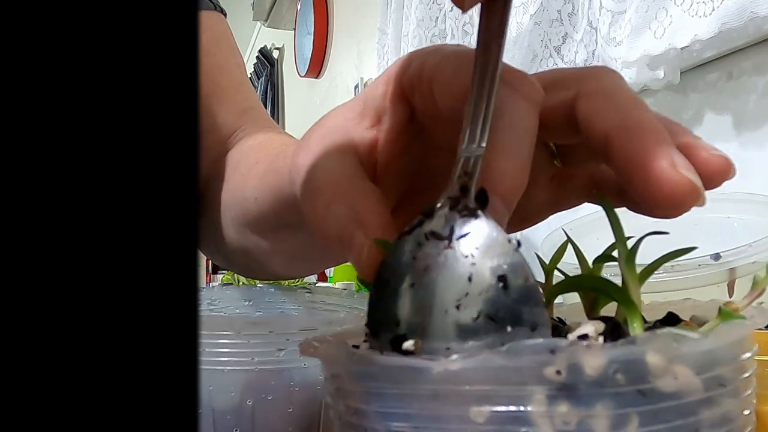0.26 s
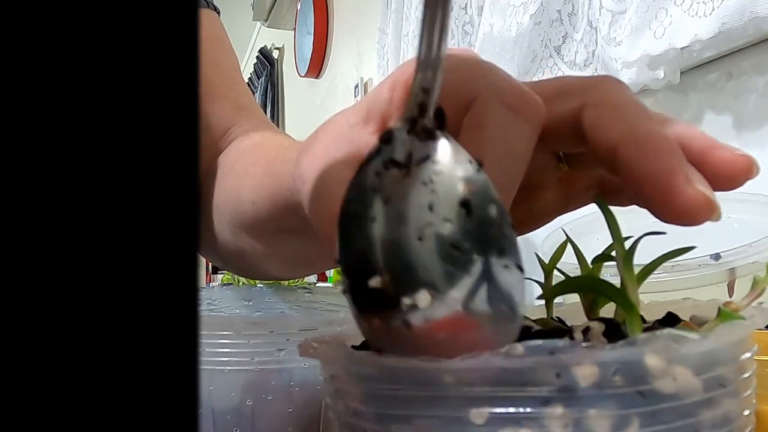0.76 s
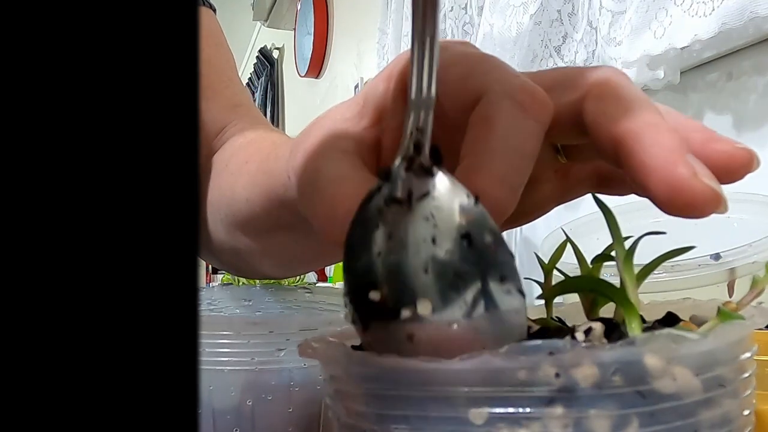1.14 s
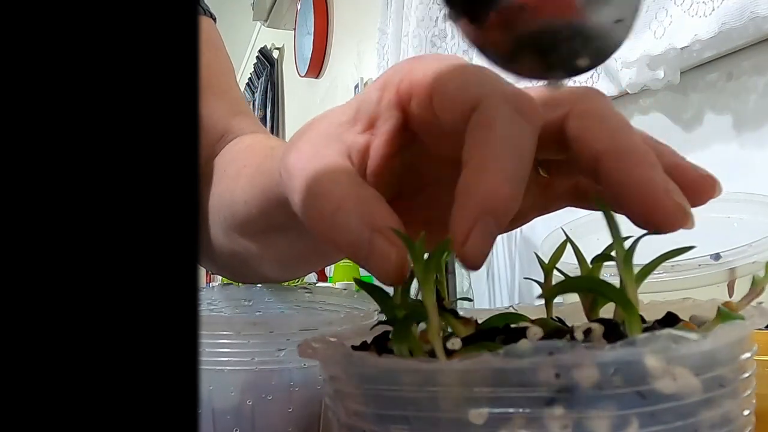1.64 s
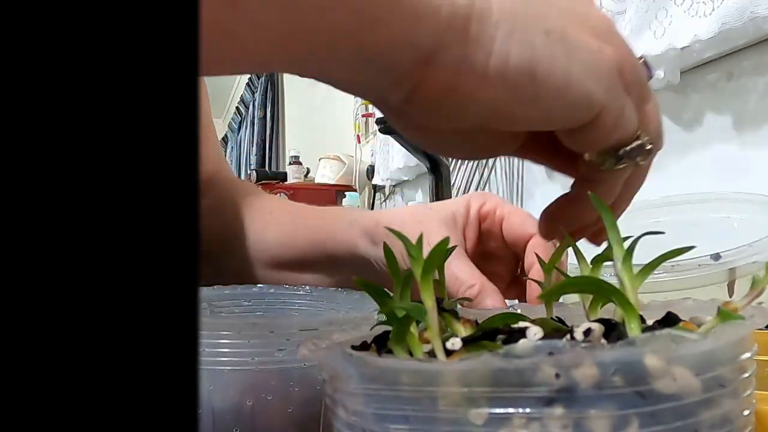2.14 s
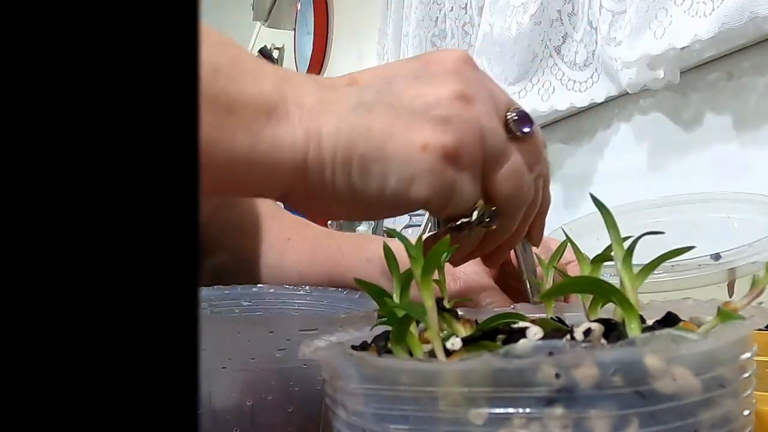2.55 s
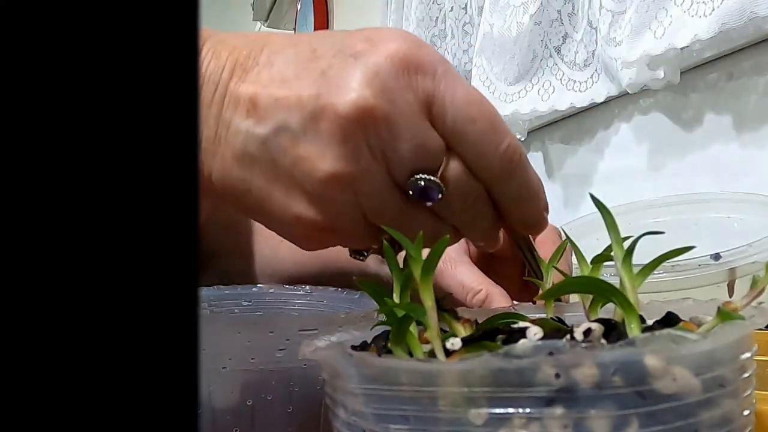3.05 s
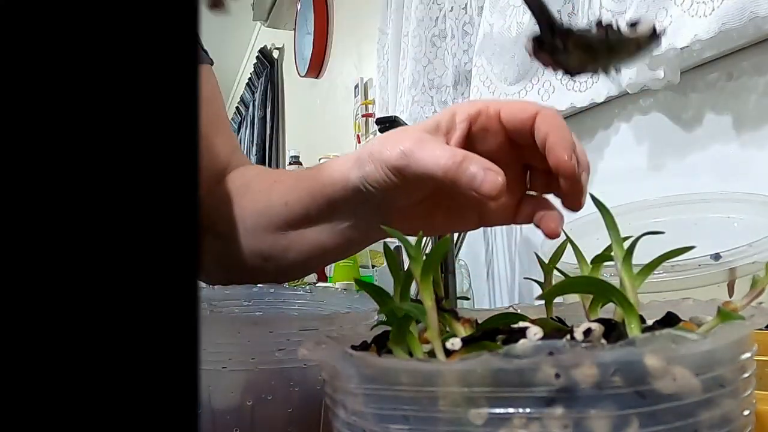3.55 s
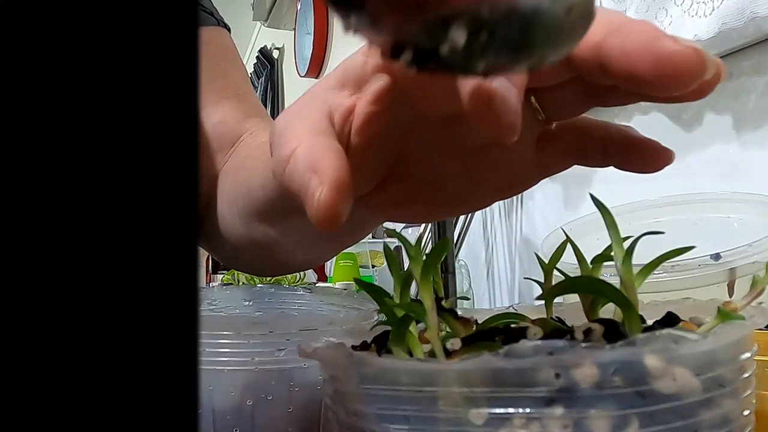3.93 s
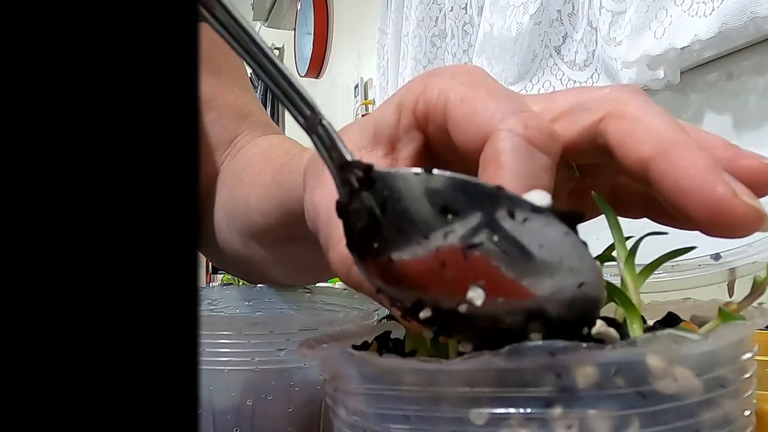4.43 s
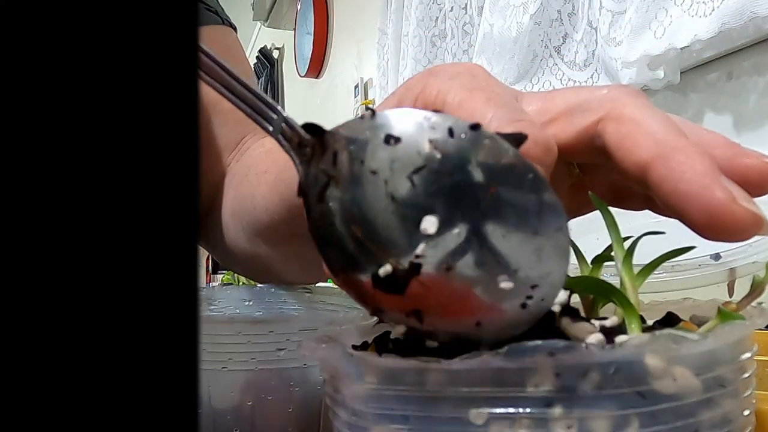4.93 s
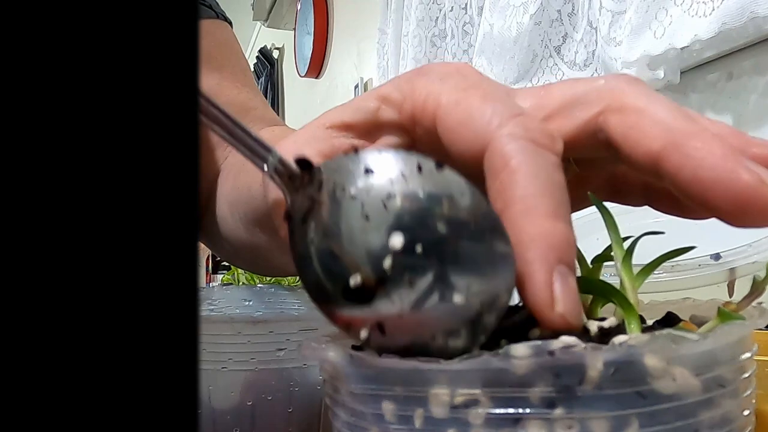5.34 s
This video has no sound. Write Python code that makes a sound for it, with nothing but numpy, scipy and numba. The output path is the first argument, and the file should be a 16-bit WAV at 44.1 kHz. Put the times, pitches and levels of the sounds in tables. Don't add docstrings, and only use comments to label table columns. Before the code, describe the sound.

A quiet small kitchen with a low refrigerator hum, soft air rumble and faint hiss, picked up in stereo very close to a thin plastic pot. From 0 to 0.65 s a steel spoon presses bark chips and perlite: dry, bright crunches, brittle snaps and ticks, the wall flexing. Shorter pushes come at about 0.8 and 1.1 s, with faint grit scraping the steel, fading to near quiet by 1.7 s. From 2.2 to 3.0 s the spoon digs in a deeper tub a little to the right and further off: duller, hollow rustling strokes, knocks, brief wall rings and low table thuds, strongest around 2.4 and 2.6-2.8 s. Light rim clips follow at 3.15-3.27 s. After a lull, crumbs tick on the pot at 4.05 and 4.2 s. From 4.75 s strong, close crunching and snapping return, densest around 5.0-5.2 s, with tiny steel pings, thinning out to the end at about 5.6 s.

```python
import sys
import numpy as np
from scipy import signal
from scipy.fft import rfft, irfft
from scipy.io import wavfile
from numba import njit

SR = 44100
rng = np.random.default_rng(int(sys.argv[2]) if len(sys.argv) > 2 else 0)


def materialize(psi):
    bounded = np.clip(np.atleast_2d(psi).T, -1, 1)
    quanta = np.round(bounded * 32767).astype(np.int16)
    wavfile.write(sys.argv[1], SR, quanta)


def field_ratio(decibels):
    return 10 ** (np.asarray(decibels, dtype=float) / 20)


N = 246078
TIME = np.arange(N) / SR

# (time [s], pitch [Hz], level [dB])
FRIDGE_HUM = [(0.0, 48.7, -48.5), (1.15, 49.03, -52), (1.3, 47.84, -46), (1.71, 49.6, -52),
              (1.86, 50.12, -45.5), (3.57, 49.03, -48), (4.74, 49.44, -44.5), (4.79, 49.1, -50),
              (4.961, 48.95, -47), (5.0, 47.04, -60), (5.19, 46.7, -40), (5.28, 50.1, -53.5),
              (5.41, 50, -51), (5.58, 46.9, -45.5)]
# (frequency [Hz], density [dB per Hz])
AIR_RUMBLE = [(15, -40), (30, 0.5), (62, -2.5), (80, -7), (110, -6.5), (135, -15), (162, -6), (195, -17),
              (300, -16), (420, -26), (600, -35), (1400, -60)]
# (frequency [Hz], density [dB per Hz])
AIR_HISS = [(300, -12), (600, 0), (2500, -5), (4000, -8), (6500, -10), (8500, -15), (10500, -26),
            (15000, -43)]

# (time [s], length [s], crunch [dB], dull part [dB], bright part [dB])
FIRST_PUSHES = [(0, 0.025, -40, -12, -5), (.03, 0.094, -46.5, -9.5, -7.5), (.14, 0.13, -59, -1, -7.5),
                (.235, 0.061, -69.5, 1, -1), (.31, 0.042, -61, -1, -3.5), (.37, 0.048, -64, -13, -11),
                (.42, 0.053, -62.5, -37, -7), (.525, 0.084, -54, -8.5, -10.5), (.592, 0.022, -60, 2, -11),
                (.69, 0.044, -66, -13, -3), (.828, 0.011, -50, -8, -12), (1.08, 0.01, -51.5, -4, -4),
                (1.105, 0.038, -49.5, -1.5, -8), (1.155, 0.1, -62, -12, -10.5),
                (1.31, 0.086, -72.5, -24, -7), (1.365, 0.021, -53.5, -6.5, -10.5),
                (1.42, 0.017, -58.5, -11, -8.5), (1.672, 0.026, -72.5, -11, -7)]
# (time [s], length [s], crunch [dB], dull part [dB], bright part [dB])
SECOND_PUSHES = [(4.28, 0.038, -75, -10, -35), (4.393, 0.044, -56.5, -12, -12), (4.6, 0.013, -73, -20, -11),
                 (4.773, 0.0034, -57, -28, 0), (4.813, 0.013, -44, -5.5, -31),
                 (4.869, 0.0042, -59.5, 7, 2.5), (4.976, 0.021, -57.5, -4, -26),
                 (5.038, 0.0028, -38.5, -1.5, -16), (5.076, 0.0074, -40.5, -12.5, -12),
                 (5.083, 0.019, -54, -6, -17), (5.129, 0.052, -44, -7, -3.5), (5.368, 0.024, -46, 0, -12),
                 (5.444, 0.1, -52.5, -10, -12), (5.525, 0.058, -57, -6, -4)]
# (time [s], length [s], crunch [dB], dull part [dB], bright part [dB])
SETTLING = [
    (0.078, 0.85, -69.5, -5, -9),
    (1.11, 0.43, -87, 9, 3),
    (4.221, 0.78, -79, -6, -5),
    (4.757, 0.85, -72, 2.5, -3),
]
# (time [s], peak [dB], pitch [Hz], bright part [dB])
FIRST_SNAPS = [(0.0054, -18, 3300, -20), (0.0134, -26, 3420, -30), (0.0484, -27.5, 2230, -18),
               (0.0635, -29, 2320, -15), (0.0784, -25.5, 2530, -19), (0.0962, -23, 2700, -28),
               (0.1054, -27.5, 2320, -28), (0.1346, -28, 2423, -27), (0.1514, -40, 3655, -25),
               (0.2035, -33.5, 2520, -35), (0.2435, -27.5, 3750, -37), (0.2504, -35, 2680, -21),
               (0.2824, -40, 2030, -23), (0.3174, -33, 2400, -23), (0.379, -37, 2468, -19),
               (0.4543, -35, 2320, -24), (0.5507, -31.5, 2553, -28), (0.5685, -27.5, 2500, -23.5),
               (0.5985, -20.5, 3800, -31), (0.616, -32, 3743, -30), (0.8315, -22, 2160, -45),
               (0.8396, -27, 2700, -27), (0.86, -35.5, 2370, -25), (0.8909, -35.5, 2560, -33),
               (1.085, -25.5, 2600, -27), (1.1124, -24.5, 2220, -32), (1.1354, -28, 2920, -29),
               (1.1786, -40, 2600, -14), (1.3668, -31, 2442, -32), (1.4353, -35.5, 2480, -24)]
# (time [s], peak [dB], pitch [Hz], bright part [dB])
SECOND_SNAPS = [(4.775, -20.5, 2710, -24), (4.8083, -24, 3020, -17), (4.815, -16, 3200, -23),
                (4.8709, -19, 1520, -35), (4.9098, -28, 1680, -28), (4.9604, -23.5, 2770, -19),
                (4.9829, -22, 2190, -31), (4.9922, -29, 2270, -40), (5.0304, -24, 2200, -40),
                (5.0382, -25, 1730, -36), (5.0564, -25, 2400, -15.5), (5.0781, -22, 2420, -34),
                (5.0847, -14.5, 2760, -32), (5.0979, -18, 2690, -31), (5.1076, -31, 2390, -24),
                (5.1233, -46, 2400, -34), (5.1404, -28, 2300, -36), (5.1513, -26, 3750, -32),
                (5.1634, -40, 2662, -22), (5.1857, -20, 1870, -28), (5.243, -38, 4150, -3.5),
                (5.2647, -28, 2600, -30), (5.2887, -34.5, 2267, -30), (5.3306, -38, 2400, -24),
                (5.3547, -32.5, 3000, -16), (5.3737, -22.5, 3000, -20.5), (5.4073, -30, 1930, -20),
                (5.4235, -27, 2520, -20.5), (5.4919, -22, 3810, -19), (5.5031, -24.5, 4100, -32)]
# (time [s], peak [dB], pitch [Hz], bright part [dB])
SMALL_TICKS = [(0.0255, -38, 1710, -7), (0.047, -26, 2310, -4), (0.109, -27.5, 1800, -19),
               (0.1633, -32, 3730, -15), (0.1724, -38, 2890, -1), (0.258, -38, 3680, -7),
               (0.271, -39, 2630, -5), (0.434, -42, 2600, -9), (0.519, -44, 2649, -12),
               (0.535, -49, 2390, -22), (0.601, -15.5, 3330, -26), (0.621, -42, 5060, -5),
               (0.6366, -41, 5300, -9), (0.813, -39, 1980, -12), (0.872, -50, 2482, -17),
               (0.881, -47, 3570, -17), (1.119, -26, 2518, -18), (1.1431, -31, 2430, -13),
               (4.7526, -48, 3530, 0), (4.773, -36, 2760, -9), (4.788, -31, 4700, -11),
               (4.7952, -32, 2950, -13), (4.8027, -30, 2580, -21), (4.873, -22.5, 2620, -29),
               (4.8885, -38, 2650, -31), (4.8944, -33, 1510, -6), (4.9188, -31, 2910, -15),
               (4.93, -32, 2330, -26), (4.9676, -34, 2480, -4), (5.002, -39, 2280, -30),
               (5.0209, -40, 2260, -32), (5.0394, -17, 2140, -26), (5.0481, -32, 2450, -9),
               (5.0813, -18, 2280, -29), (5.135, -19, 2550, -9), (5.1382, -17.5, 3840, -6),
               (5.2324, -39, 2336, -4), (5.3863, -27, 2470, -13), (5.444, -35, 3920, -13)]
# (time [s], peak [dB], pitch [Hz], bright part [dB])
LOOSE_CRUMBS = [(1.5253, -57, 3400, -16), (4.0544, -39.5, 3030, -15.5), (4.078, -51, 2616, -18),
                (4.2199, -26.5, 1620, -18.5), (4.314, -50, 1540, -21), (4.3496, -56, 2440, -10),
                (4.4102, -44, 2953, -11), (4.432, -41, 2580, -26), (4.607, -52, 3240, -14),
                (4.643, -56.5, 2490, -19), (5.3128, -39, 2820, -11), (5.475, -31.5, 2120, -14),
                (5.5341, -27, 4540, -28), (5.563, -36, 2470, -6), (1.093, -31, 2480, -24),
                (1.501, -64, 7500, -6), (0.972, -60, 2500, -15), (4.185, -66, 4000, -13.5),
                (4.287, -59, 2400, -25), (1.3206, -45.5, 2550, -29), (4.542, -64, 5004, 0.5),
                (4.616, -60, 4500, -5), (5.299, -42, 2300, -20), (5.5372, -25, 4550, -27),
                (5.576, -41, 5500, -2)]
# (time [s], peak [dB], pitch [Hz])
WALL_FLEXES = [(0.014, -27, 916), (0.048, -35, 940), (0.085, -35, 920), (0.105, -38, 931),
               (0.161, -40, 760), (0.248, -48, 966), (0.284, -35, 940), (0.317, -28.5, 860),
               (0.601, -25.5, 1160), (0.831, -39, 1070), (1.105, -41, 711), (1.113, -29, 1300),
               (1.128, -34, 917), (1.135, -40, 1140), (1.144, -35, 1060), (4.809, -30, 1180),
               (4.819, -16.5, 1150), (4.827, -24, 1040), (4.91, -40, 1330), (4.984, -24.5, 1120),
               (4.991, -27, 1210), (5.038, -18.5, 905), (5.057, -30, 1190), (5.085, -23.5, 990),
               (5.096, -26, 900), (5.137, -21, 1060), (5.15, -31, 1366), (5.162, -45, 920),
               (5.185, -24, 1336), (5.265, -33, 1080), (5.375, -43, 1018), (5.423, -30, 1056),
               (5.538, -41, 980), (5.551, -38, 945), (5.567, -28.5, 1100)]
# (time [s], peak [dB], pitch [Hz], t60 [s])
WALL_DROPS = [(4.054, -44, 1200, .01), (4.226, -50, 1560, .13), (4.2225, -42, 1650, .03),
              (4.223, -54, 1010, .03), (4.223, -47, 1314, .05), (4.054, -47, 2000, .008),
              (4.054, -46, 4900, .005), (4.2205, -37, 4900, .012), (4.2205, -37, 5800, .008),
              (4.209, -58, 1600, .03), (4.2205, -36, 3450, .012), (4.2205, -36, 2600, .015)]
# (frequency [Hz], density [dB per Hz])
POT_CRUNCH_COLOUR = [(210, -47), (350, -37), (563, -15.5), (892, -15), (1410, -23), (2420, -4), (3780, -13),
                     (7010, -21), (7960, -13), (13000, -43), (15500, -18)]
# (frequency [Hz], width [Hz], level [dB])
POT_MODES = [(1070, 230, 3), (1730, 107, 6), (2530, 780, 3.5), (3750, 320, 8), (5220, 2250, 8)]

# (frequency [Hz], width [Hz], level [dB])
SPOON_MODES = [(2430, 90, -7), (3460, 160, -10), (3850, 140, -11), (6550, 220, -16), (4900, 260, -16),
               (5970, 100, -17), (7870, 80, -8), (9290, 90, -15), (13000, 150, -24)]
# (time [s], length [s], level [dB])
GRIT_SLIDES = [
    (0.672, 0.081, -81.5),
    (1.203, 0.054, -78.5),
    (1.326, 0.063, -82),
    (1.517, 0.0048, -73),
    (4.38, 0.11, -91),
    (4.563, 0.031, -89),
    (5.202, 0.013, -68),
    (5.236, 0.025, -69),
    (5.366, 0.029, -68),
]
# (time [s], peak [dB])
BOWL_PINGS = [(0.7345, -55), (1.2136, -63), (1.2261, -58), (1.524, -66), (5.053, -55), (5.1305, -50),
              (5.152, -48), (5.2086, -55), (5.244, -47), (5.366, -56), (5.3865, -50)]
# (frequency [Hz], level [dB], t60 [s])
BOWL_MODES = [(5980, -8, .025), (7876, 0, .032), (9300, -4, .05), (11580, -20, .04), (13010, -9, .06)]

# (time [s], length [s], crunch [dB], bright part [dB])
DIG_STROKES = [(2.233, 0.034, -49.5, -7), (2.323, 0.073, -45, -24), (2.384, 0.057, -34.5, -16.5),
               (2.439, 0.019, -42.5, -11), (2.469, 0.088, -47, -5), (2.55, 0.059, -40.5, -7.5),
               (2.598, 0.033, -39.5, -6), (2.632, 0.04, -42, -10), (2.703, 0.086, -40, -5),
               (2.776, 0.036, -40, -5.5), (2.814, 0.12, -44, -9), (2.934, 0.11, -47.5, -13.5),
               (3.05, 0.05, -54.5, -21), (3.152, 0.022, -54, -7), (3.178, 0.058, -57, -6.5),
               (3.249, 0.039, -51.5, -7.5), (2.259, 0.87, -60, -4.5), (3.289, 0.063, -63, -6),
               (3.34, 0.16, -75, 2)]
# (time [s], peak [dB], pitch [Hz])
TUB_KNOCKS = [(2.3336, -30, 1070), (2.3709, -27.5, 690), (2.3945, -20.5, 800), (2.4031, -20, 1370),
              (2.4115, -32, 1130), (2.4494, -28, 1000), (2.5538, -23.5, 860), (2.561, -24, 829.3),
              (2.6088, -24, 1360), (2.6156, -21, 786), (2.6411, -18, 1430), (2.7297, -22, 900),
              (2.7506, -16, 910), (2.7863, -13.5, 900), (2.7919, -13.5, 760), (2.7986, -40, 630),
              (3.2052, -35, 846), (2.247, -35, 750), (2.256, -33.5, 1010), (2.36, -39, 1130),
              (2.648, -19, 1320), (3.001, -36, 1476), (3.088, -46, 964), (3.222, -42, 1500)]
# (time [s], peak [dB], pitch [Hz], t60 [s])
WALL_RINGS = [
    (2.369, -37, 620, .07),
    (2.404, -25, 1118, 0.065),
    (2.42, -36, 446, 0.081),
    (2.61, -29, 774, 0.069),
    (2.783, -25.5, 1515, 0.044),
    (2.787, -29.5, 614, 0.098),
    (2.797, -31, 608, 0.067),
]
# (time [s], peak [dB], pitch [Hz])
TABLE_BUMPS = [(2.406, -32, 91.5), (2.414, -18.5, 124), (2.453, -28, 105), (2.557, -22.5, 167),
               (2.582, -39, 148), (2.606, -21, 118), (2.645, -23, 167), (2.729, -31.5, 153),
               (2.75, -42.5, 183), (2.784, -18.5, 202), (2.799, -32.5, 172)]
# (time [s], peak [dB], pitch [Hz], middle part [dB], bright part [dB])
RIM_CLIPS = [
    (3.1575, -28.5, 1530, -3.5, -18),
    (3.195, -42.5, 1800, 9, 0),
    (3.2557, -31.5, 1432, 7.5, -1.5),
    (3.2695, -33, 1120, -2, -25),
]
# (frequency [Hz], density [dB per Hz])
TUB_CRUNCH_COLOUR = [(180, -41), (300, -40.5), (484, 0), (600, -2.5), (674, -2.5), (794, 1.5), (1540, -4),
                     (1970, -16.5), (6360, -24), (12300, -41.5), (15500, -81)]
# (frequency [Hz], width [Hz], level [dB])
TUB_MODES = [(604, 18, 4.5), (860, 167, -1), (1110, 27, -19), (1350, 110, -4), (1510, 45, -1),
             (2215, 57, -4.5), (3320, 50, -7), (4120, 55, -8.5)]
# (frequency [Hz], width [Hz], level [dB])
THUD_MODES = [(123, 96, 2), (169, 57, 1.5), (279, 52, -0.5)]

LONGER_RING = 0.55


def level(x, db):
    return x * field_ratio(db) / np.sqrt(np.mean(x ** 2))


def colour_db(hz, points):
    point_hz, point_db = np.transpose(points)
    return np.interp(np.log(hz), np.log(point_hz), point_db)


def resonate(x, modes):
    x = x + 1e-15
    out = 0
    for hz, width, db in modes:
        out = out + field_ratio(db) * signal.lfilter(*signal.iirpeak(hz, hz / width, fs=SR), x)
    return out


@njit
def ring(at, hz, cycles, rise, size, lag, pan, n):
    out = np.zeros((2, n))
    for k in range(len(at)):
        s = 2 * np.pi * hz[k] * (1j - 1 / (2 * cycles[k]))
        contact = np.exp(-hz[k] / rise)
        for c in range(2):
            start = at[k] + (lag[k] if c == 0 else 0.)
            i = int(np.ceil(start))
            z = size[k] * (pan[k] if c == 0 else 1 / pan[k]) * np.exp(s * (i - start))
            p, rest = np.exp(s), contact ** (i - start)
            for j in range(max(i, 0), min(i + int(2.5 * cycles[k] / hz[k]) + 2, n)):
                out[c, j] += z.imag * (1 - rest)
                z *= p
                rest *= contact
    return out


def grains(s, hz, db, cycles, chance, lag=1.9, lag_spread=.9, pan_db=1.2, right_db=-.8, rise=.45):
    side_db = right_db * hz / 2500 + pan_db * chance[0]
    size = field_ratio(db) * np.sign(chance[2])
    pitch = np.clip(hz, 60, .36 * SR) / SR
    delay = lag + lag_spread * chance[1]
    return ring(s * SR, pitch, cycles + 0 * s, rise, size, delay, field_ratio(side_db / 2), N)


def struck(t, db, hz, t60):
    cycles = np.pi * hz * t60 / np.log(1000)
    return grains(t, hz, db, cycles, rng.standard_normal((len(t), 3)).T)


def effort(start, length, db, rise=0.1, release_s=0.0066):
    gain = np.zeros(N)
    for t0, hold, size in zip(start, length, field_ratio(db)):
        first = int(t0 * SR)
        t = TIME[first:int((t0 + hold + .1) * SR)] - t0
        build_up = np.clip(t / (rise * min(hold, .1)), 0, 1)
        let_go = np.exp(-np.maximum(t - hold, 0) / (release_s + 0.08 * min(hold, .1)))
        gain[first:first + len(t)] += size * build_up * let_go
    return gain


def patchy(spread_db, hold):
    steps = np.repeat(rng.standard_normal(N // hold + 1), hold)[:N]
    return field_ratio(spread_db * steps)


def steady(points, db, alike_hz):
    f = np.arange(N // 2 + 1) * SR / N + 1
    mid, side = rfft(rng.standard_normal((2, N))) * field_ratio(colour_db(f, points))
    side = side * np.clip(f / alike_hz, .05, 1)
    return level(irfft(np.array([mid + side, mid - side]), N), db)


def kitchen():
    t, hz, db = np.transpose(FRIDGE_HUM)
    phase = 2 * np.pi * np.cumsum(np.interp(TIME, t, hz)) / SR
    hum = np.sqrt(2) * field_ratio(np.interp(TIME, t, db)) * np.sin(phase)
    swell = field_ratio(2.2 * np.interp(TIME, np.arange(40) / 6, rng.standard_normal(40)))
    return hum + steady(AIR_RUMBLE, -54.5, 300) + swell * steady(AIR_HISS, -73.5, 3000)


def pot():
    edges_hz = [(1450, 5500), (350, 1450), (5500, 15500)]
    pushes = [*FIRST_PUSHES, *SECOND_PUSHES, *SETTLING]
    chips = crunch(pushes, POT_CRUNCH_COLOUR, edges_hz, count=40000, scatter_db=1.0, cycles=2.1,
                   clump_db=3, rise=0.083)
    chips = chips + field_ratio(7) * snaps(breaking_chips(), 1010, 6240, 3.7, -8.0, 0.0076, count=7)
    wall = field_ratio(-5.5) * resonate(chips, POT_MODES)
    steel = field_ratio(1.5) * resonate(chips, SPOON_MODES)
    return chips + wall + steel + wall_flexes() + scrape() + crumbs_on_wall()


def crunch(table, colour, edges_hz, count, scatter_db, cycles, clump_db, rise):
    start, length, main_db, second_db, bright_db = np.transpose(table)[:5]
    even, chance = rng.random((count, 3)).T, rng.standard_normal((count, 3)).T
    s = start.min() + (max(start + length) + .1 - start.min()) * even[0]
    hz = 420 * (15500 / 420) ** np.sqrt(even[1])
    clumps = clump_db * np.interp(s, np.arange(0, 6, .005), rng.standard_normal(1200))
    db = colour_db(hz, colour) + (17 - 10 * LONGER_RING) * np.log10(hz / 1000)
    db = db - scatter_db * np.log(even[2]) + clumps
    swings = cycles * (hz / 1000) ** LONGER_RING
    active = slice(int(s.min() * SR), int(s.max() * SR))
    out = 0
    for (lo, hi), part_db in zip(edges_hz, (0, second_db, bright_db)):
        pick = (hz >= lo) & (hz < hi)
        band = grains(s[pick], hz[pick], db[pick], swings[pick], chance[:, pick])
        rms = np.sqrt(np.mean(band[:, active] ** 2))
        out = out + band / rms * effort(start, length, main_db + part_db, rise)
    return out


def room(x):
    t60_s, tail_db, alike_hz = 0.15, -14.5, 900
    t = np.arange(SR // 3) / SR
    mid, side = rng.standard_normal((2, len(t))) * field_ratio(-60 * t / t60_s) * (t > .003)
    side = signal.lfilter(*signal.butter(1, alike_hz, "high", fs=SR), side)
    tail = signal.lfilter([1], [1, -.5], [mid + side, mid - side])
    tail = tail * field_ratio(tail_db) / np.sqrt(np.sum(tail ** 2, axis=1, keepdims=True))
    return signal.fftconvolve(x, tail, axes=1)[:, :N]


def breaking_chips():
    pressed = np.vstack([FIRST_SNAPS, SECOND_SNAPS]) + [.0007, -3, 0, 5.5]
    small = np.array(SMALL_TICKS) + [0, -5.5, 0, -7.5]
    t, db, hz, bright_db = np.vstack([pressed, small, LOOSE_CRUMBS]).T
    dull_db = -22 + 1.5 * rng.standard_normal(len(t))
    return np.transpose([t, db, hz, dull_db, bright_db])


def snaps(table, second_hz, bright_hz, cycles, crumble_db, crumble_s, count):
    t, db, hz, second_db, bright_db = (c[:, None, None] for c in np.transpose(table))
    chance = rng.standard_normal((len(table), count, 7, 5))
    crumb = np.arange(count)[None, :, None] > 0
    wait = crumb * rng.random((len(table), count, 1))
    part = np.arange(7)[None, None, :]
    bright = part > 1
    pitch = np.where(bright, bright_hz * 1.21 ** (part - 3), second_hz)
    pitch = np.where(part == 0, hz, pitch)
    detune = np.where(bright, .06, np.where(crumb | (part > 0), .22, .02))
    pitch = pitch * np.exp(detune * chance[..., 3])
    gain_db = db + np.where(part == 1, second_db, 0)
    gain_db = gain_db + np.where(bright, bright_db - 2.5 - 0.74 * (part - 3), 0)
    gain_db = gain_db + crumb * (crumble_db - 20 * wait + 4.2 * chance[..., 4])
    swings = np.where(bright, 10.5, cycles) + 0 * pitch
    late = bright * .001 * np.abs(chance[..., 0])
    when = t + crumble_s * wait + late
    sign = chance[..., 2].ravel()
    place = np.broadcast_to(chance[:, :, :1, :2], chance[..., :2].shape).reshape(-1, 2).T
    return grains(when.ravel(), pitch.ravel(), gain_db.ravel(), swings.ravel(), (*place, sign), rise=.85)


def wall_flexes():
    t, db, hz = np.transpose(WALL_FLEXES)
    return grains(t, hz, db - 4.5, 7.1, rng.standard_normal((len(t), 3)).T)


def scrape():
    grit = rng.standard_normal((2, N)) * patchy(4.0, hold=200)
    rubbing = level(grit[0] + 0.78 * grit, 36.6)
    return resonate(rubbing * effort(*np.transpose(GRIT_SLIDES)), SPOON_MODES)


def pings():
    t, db = np.repeat(BOWL_PINGS, len(BOWL_MODES), axis=0).T
    hz, mode_db, t60 = np.tile(BOWL_MODES, (len(BOWL_PINGS), 1)).T
    return struck(t, db + mode_db, hz, t60)


def tub():
    edges_hz = [(350, 1750), (1750, 5500), (5500, 15500)]
    chips = crunch(strokes(), TUB_CRUNCH_COLOUR, edges_hz, count=12000, scatter_db=0.0, cycles=1.75,
                   clump_db=2, rise=0.32)
    knocks = [(*row, -3.5, -17) for row in TUB_KNOCKS]
    chips = chips + field_ratio(5) * snaps(knocks, 3000, 6500, 3.8, -10, .015, count=10)
    chips = chips + field_ratio(5.5) * snaps(RIM_CLIPS, 2940, 4700, 3.7, -3, 0.0088, count=4)
    wall = field_ratio(-1.5) * resonate(chips, TUB_MODES) + struck(*np.transpose(WALL_RINGS))
    right = field_ratio(np.array([[-.7], [.7]]))
    return right * (field_ratio(-5.5) * chips + wall + table_thuds() + table_bumps())


def strokes():
    t, length, db, bright_db = np.transpose(DIG_STROKES)
    return np.transpose([t, length, db, 5.5 + 0.76 * bright_db, bright_db])


def table_thuds():
    start, length, db, _ = np.transpose(DIG_STROKES)
    full_stroke_db, growth, drag_db_per_s = -33, 0.06, -100
    thud_db = db + growth * (db - full_stroke_db) - 1.5 + drag_db_per_s * length
    shoves = level(rng.standard_normal(N) * patchy(6.7, hold=256), 12.6)
    shoves = shoves * effort(start, length, thud_db)
    return resonate(resonate(shoves, THUD_MODES), THUD_MODES)


def table_bumps():
    t, db, hz = np.transpose(TABLE_BUMPS)
    return grains(t, hz, db + 3.5, 2.3, rng.standard_normal((len(t), 3)).T, pan_db=.2, rise=.6)


def crumbs_on_wall():
    return struck(*np.transpose(WALL_DROPS))


def scene():
    chips = pot() + pings() + tub()
    chips = signal.sosfilt(signal.butter(2, 13000, fs=SR, output="sos"), chips)
    return kitchen() + chips + room(chips)


def top_cut(x):
    return signal.sosfilt(signal.butter(12, 15740, fs=SR, output="sos"), x)


def record(dry):
    return top_cut(dry)


dry = scene()
out = record(dry)
materialize(out)
```